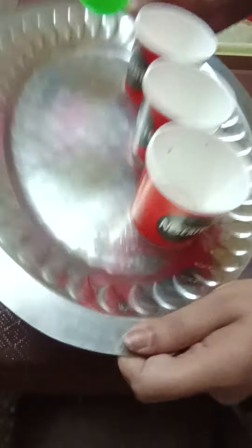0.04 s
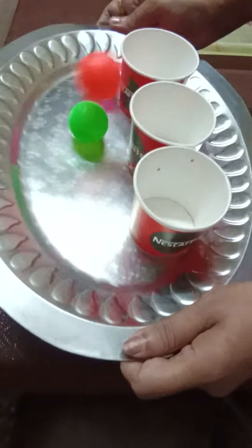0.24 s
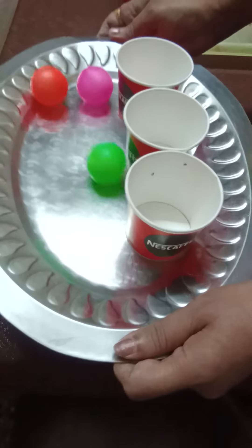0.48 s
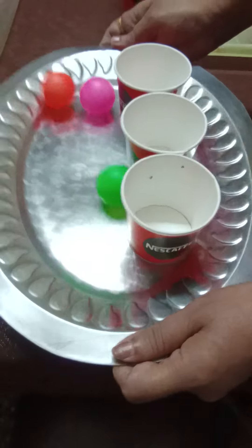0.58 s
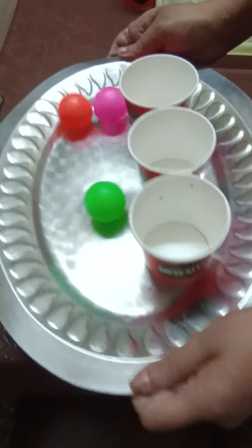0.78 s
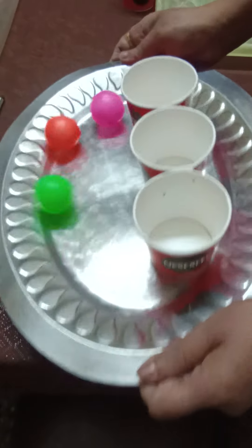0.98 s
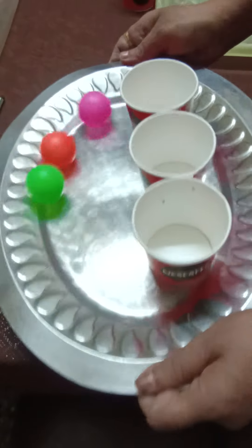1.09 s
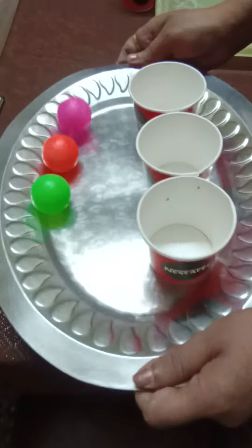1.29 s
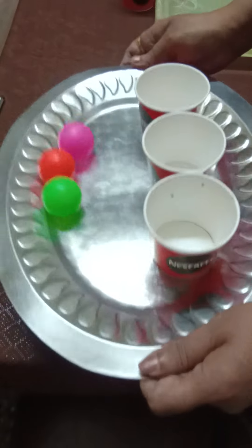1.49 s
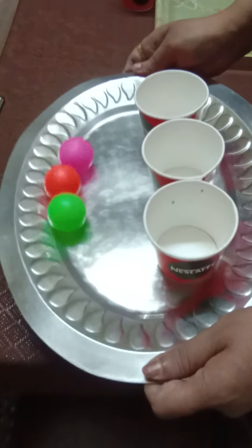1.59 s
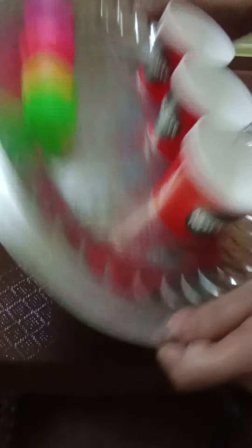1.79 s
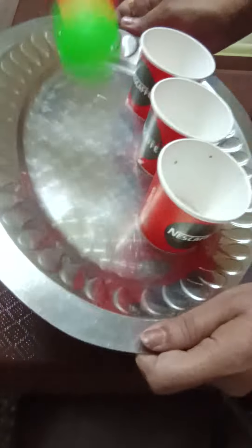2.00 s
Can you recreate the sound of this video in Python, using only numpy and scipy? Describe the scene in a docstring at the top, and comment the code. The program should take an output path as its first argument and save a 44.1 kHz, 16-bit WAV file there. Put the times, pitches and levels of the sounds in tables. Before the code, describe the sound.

Small hollow balls clatter onto a hand-held metal tray, each bounce making it ring briefly. Softer rolling follows, with light knocks on the rim and against each other, then dies away. The microphone is close, in a quiet room.

```python
"""A quiet room: three light plastic balls drop onto a thin, hand-held metal tray, bounce, roll
and knock against its fluted rim. Each contact gives a short clack and sets the sheet ringing;
rolling is a stream of tiny contacts on the same sheet. The hollow shells click against each other.
Two close microphone ports hear it over faint rumble and hiss."""
import sys
import numpy as np
from scipy import signal
from scipy.fft import rfft, irfft
from scipy.io import wavfile

SR = 44100
rng = np.random.default_rng(int(sys.argv[2]) if len(sys.argv) > 2 else 0)


def master(y):
    """Save y as 16-bit WAV."""
    cut = np.clip(np.atleast_2d(y).T, -1, 1)
    pcm = np.round(cut * 32767)  # scale
    wavfile.write(sys.argv[1], SR, pcm.astype(np.int16))


N = 90404

# Ball contacts. Each row: start in seconds, level in dB, then hollow body, hard clang, bright tick in dB.
HITS = [(-.04, -41.5, 6, -0.5, 5.5), (.2353, -22.5, 4.5, -1, 2), (.2615, -33.5, -11, 0, 7.5),
        (.2985, -15, -4.5, 6.5, 0.5), (.3495, -20, -1.5, -4, -1), (.3752, -24.5, -13, -3, -2.5),
        (.4228, -25, 0, 0.5, -0.5), (0.4498, -40, 0, 9, 7), (.4607, -16.5, -4, 4, 0.5),
        (.5205, -28, 1, -0.5, -5), (.567, -30.5, -1, -5, -0.5), (.578, -39.5, -27, -3, 2),
        (.598, -35, -6, -9, -7), (.632, -42.5, 4.5, 6, -5), (.7168, -39.5, 0.5, -3.5, 4),
        (.7497, -38.5, 5.5, -3.5, -1.5), (.7735, -40.5, -4, -8, -2), (0.786, -48.5, -11, -10, 7),
        (.803, -48, -2, -1, 5), (.844, -51, -13, -7, 5), (.8555, -41.5, 5, -1.5, -3.5),
        (0.9051, -48, -5, 7, 2.5), (.9686, -49, 2.5, -11, -13), (1.052, -45, 1, -27, -3),
        (1.0966, -38.5, -7, -0.5, -8), (1.1103, -36.5, 8.5, -1.5, 3.5), (1.121, -36, 2, -21, -15),
        (1.158, -45.5, 20.5, 6.5, 8.5), (1.169, -43, 14, -19, -17), (1.1959, -40.5, 14.5, 3.5, 2),
        (1.2158, -42.5, 5, 1, 10), (1.2237, -30.5, -1, -2.5, -2), (1.259, -34, 1.5, -3.5, -0.5),
        (1.2862, -38.5, 4, 0, 1.5), (1.3096, -38.5, 3.5, -4, 0), (1.3297, -39, -2, -9, -3.5),
        (1.357, -41, -12, -6, -7), (1.367, -50, 8.5, -17, 3), (1.4201, -29.5, -5, -8.5, -5),
        (1.4502, -28, -5.5, -2.5, -5.5), (1.4843, -40, -5, -3, -3), (1.5, -36, -7, -2, -3),
        (1.5586, -48, 8, 6.5, 5.5), (1.567, -45, -7, 4.5, -3), (1.582, -44, 4, -3, -1),
        (1.6129, -44.5, -17, 1.5, 0.5), (1.629, -58.5, -16, 21, -6), (1.6992, -57, 5, 0, -16),
        (1.7486, -61.5, 15, 2, 5), (1.7663, -42.5, 1.5, -5.5, 0), (1.783, -43, -6.5, -1, -7),
        (1.797, -40, -7, -11, -10), (1.807, -48, 13, 6, 8.5), (1.814, -44, 2.5, 6.5, -2.5),
        (1.861, -41, 4, -5, -1)]
RING_SAMPLES, CLACK_SAMPLES = 32768, 8192
SHIMMER_T60_S = 0.2
AT_RIM_S = 1.04  # the balls reach the rim


def bounces(answers, at_rim):
    """Knocks at the rim or landings on the flat floor; each excites its own answer of the tray."""
    out = np.zeros((2, N + 2 * RING_SAMPLES))
    for (start_s, level_db, *_), answer in zip(HITS, answers):
        if (start_s > AT_RIM_S) == at_rim:
            start = RING_SAMPLES + int(start_s * SR)
            out[:, start:start + RING_SAMPLES] += from_db(level_db) * answer
    return out[:, RING_SAMPLES:RING_SAMPLES + N]


def contact(hit):
    """Louder contacts thud more and ring longer; quiet ones die away sooner."""
    _, level_db, body_db, clang_db, tick_db = hit
    quiet_to_loud_db = [-50.5, -13.5]
    thud_db = np.interp(level_db, quiet_to_loud_db, [-3.5, 3.5])
    ring_share = np.interp(level_db, quiet_to_loud_db, [0.82, 1])
    return body_db, clang_db, tick_db, thud_db, ring_share


def tray(contacts, swell_s=0.00029):
    """The sheet's stereo answer to each contact, swelling as the bending wave spreads."""
    t = np.arange(RING_SAMPLES) / SR
    tail_fade = np.array([from_db(-60 * t / SHIMMER_T60_S * (1 / ring_share - 1))
                          for *_, ring_share in contacts])
    answers = (shimmer(contacts) + tray_tones(contacts)) * tail_fade[:, None]
    answers[..., :CLACK_SAMPLES] += clack(contacts)
    return answers * (1 - np.exp(-t / swell_s))


def clack(contacts):
    """The sheet's first burst, in third octaves; the bass lasts longest."""
    # Burst spectrum. Each row: frequency in Hz, relative density in dB.
    spectrum = [(90, -42.5), (200, -21.5), (380, -27.5), (500, -7), (620, 3), (800, 4), (1000, -2),
                (1250, 5), (1650, 0.5), (2100, -3.5), (2600, -4.5), (2820, -13.5), (3800, -11.5),
                (5000, -13.5), (5900, -15.5), (7200, -13.5), (9000, -14), (11000, -21), (14500, -22.5),
                (16500, -13)]
    # Burst decay. Each row: frequency in Hz, T60 in seconds.
    decay = [(200, 0.33), (700, 0.043), (2000, 0.059), (5000, 0.043), (12000, 0.017)]
    hz = np.fft.rfftfreq(CLACK_SAMPLES, 1 / SR)
    edges_hz = np.geomspace(80, 17000, 25)
    centres_hz = np.sqrt(edges_hz[1:] * edges_hz[:-1])
    gains = from_db(at_hz(spectrum, centres_hz)) * np.sqrt(np.diff(edges_hz))
    gains /= np.linalg.norm(gains)
    waves = at_ports(hz, len(contacts)) * from_db(at_hz(spectrum, hz))
    out = 0
    for low, high, centre, gain in zip(edges_hz, edges_hz[1:], centres_hz, gains):
        envelope = fade(at_hz(decay, centre), CLACK_SAMPLES)
        noise = irfft(waves * ((hz >= low) & (hz < high)))
        band = rms_one(noise * envelope) * np.sqrt(np.mean(envelope ** 2))
        out = out + gain * colour(contacts, [centre]) * band
    return 2 * out


def tray_tones(contacts, spread_db=5):
    """Strong modes give the tray its pitch; each spot struck favours other modes."""
    # Tray modes. Each row: frequency in Hz, level in dB, T60 in seconds at full ring time.
    modes = [(221.6, -37, 0.46), (495.5, -23.5, 0.35), (589.6, -17, 0.4), (605.3, -13.5, 0.13),
             (679.6, -14.5, 0.27), (777, -18.5, 0.3), (868, -25.5, 0.41), (972, -37, .42),
             (1144, -24.5, .33), (1223, -20, 0.5), (1437, -23.5, 0.43), (1553, -16.5, 0.33),
             (1680, -22.5, 0.37), (2244, -22, 0.39), (2580, -28, 0.54), (2596, -16, 0.11),
             (2703, -30, 0.53), (2900, -33.5, 1), (3170, -31, 0.55)]
    hz, level_db, t60_s = np.transpose(modes)
    strengths = from_db(level_db + spread_db * rng.uniform(-1, 1, (len(contacts), 1, len(hz))))
    excitation = at_ports(hz, len(contacts)) * colour(contacts, hz) * strengths
    return np.real(excitation @ ringing(hz, t60_s, RING_SAMPLES))


def shimmer(contacts, count=480, level_db=-11.5, split_hz=1900, treble_t60_s=0.34):
    """Hundreds of weak sheet modes linger, struck with new phases at each contact."""
    # Weak-mode spectrum. Each row: frequency in Hz, relative density in dB.
    spectrum = [(120, -43), (210, -15.5), (380, -5.5), (520, -14.5), (750, -22), (1020, 11.5),
                (1300, -14.5), (1700, -8), (2100, -3), (2550, -4.5), (2900, -5), (3800, -5.5),
                (5000, -10.5), (5900, -17), (7200, -7), (9000, -14.5), (11000, -21.5), (14500, -25),
                (16500, -52)]
    steps = (np.arange(count) + rng.random(count)) / count
    hz = 120 + 3000 * steps + 13500 * steps ** 3
    gains = from_db(at_hz(spectrum, hz)) * np.sqrt(np.gradient(hz))
    gains /= np.linalg.norm(gains)
    bins = (hz * RING_SAMPLES / SR).astype(int)
    modes = np.zeros((len(contacts), 2, RING_SAMPLES // 2 + 1), complex)
    modes[..., bins] = at_ports(hz, len(contacts)) * colour(contacts, hz) * gains
    is_low = np.fft.rfftfreq(RING_SAMPLES, 1 / SR) < split_hz
    lows = irfft(modes * is_low) * fade(SHIMMER_T60_S, RING_SAMPLES)
    treble = irfft(modes * ~is_low) * fade(treble_t60_s, RING_SAMPLES)
    return from_db(level_db) * RING_SAMPLES / np.sqrt(2) * (lows + treble)


def colour(contacts, hz):
    """Each contact's gain over frequency, from its thud, body, clang and tick."""
    gains_db = [at_hz([(438, thud_db), (600, body_db), (1250, 0), (1940, clang_db), (9000, tick_db)], hz)
                for body_db, clang_db, tick_db, thud_db, _ in contacts]
    return from_db(gains_db)[:, None]


def rolling(answers, contacts_per_s=450, gain_db=-3):
    """Seams and dents give a stream of tiny uneven contacts over several spots of the sheet."""
    # Rolling strength. Each row: time in seconds, relative level in dB.
    strength = [(0, -50), (0.042, -69.5), (.1, -83.5), (.2, -97), (.3, -60), (.55, -48), (.62, -46.5),
                (.66, -59), (.72, -47.5), (.78, -44), (.88, -44), (.95, -53), (1.029, -56.5), (1.068, -44),
                (1.16, -43.5), (1.3, -39), (1.38, -44), (1.405, -56), (1.47, -49.5), (1.54, -42.5),
                (1.6, -42.5), (1.641, -42), (1.66, -67), (1.71, -53.5), (1.745, -59.5), (1.779, -38.5),
                (1.84, -46), (1.88, -44.5), (1.925, -55.5), (1.96, -75.5), (2.05, -84.5)]
    touches = rng.random(N) < contacts_per_s / SR
    sizes = touches * from_db(-6 * np.minimum(rng.exponential(1, N), 3))
    sizes /= np.sqrt(np.mean(sizes ** 2) * np.mean(np.sum(answers ** 2, axis=-1)))
    impulses = sizes * from_db(gain_db + np.interp(np.arange(N) / SR, *np.transpose(strength)))
    spot = rng.integers(0, len(answers), N)
    return sum(signal.fftconvolve((impulses * (spot == k))[None], answer)[:, :N]
               for k, answer in enumerate(answers))


def rim(x, size=131072):
    """The stiff fluted rim colours the contacts along it: a minimum-phase filter."""
    # Rim response. Each row: frequency in Hz, gain in dB.
    response = [(250, -5.5), (460, -8), (520, -16), (590, 1.5), (680, -5), (800, -1.5), (950, -6.5),
                (1200, -1), (1450, -0.5), (1900, -4), (2250, -1.5), (2600, -4), (3300, 3.5), (4500, -0.5),
                (6000, -2), (7000, 3.5), (8000, 0.5), (10000, 2), (11500, 4), (15000, 0)]
    gain = from_db(at_hz(response, np.fft.rfftfreq(size, 1 / SR)))
    cepstrum = irfft(np.log(gain))
    cepstrum[1:size // 2] *= 2
    cepstrum[size // 2:] = 0
    return irfft(rfft(x, size) * np.exp(rfft(cepstrum)))[:, :N]


def ball_clicks():
    """Ball meets ball: the thin shells ring high and very briefly."""
    # Collisions. Each row: start in seconds, level in dB.
    clicks = [(.2618, -36), (1.2155, -28), (1.5586, -44), (1.566, -44), (1.7486, -55)]
    # Shell modes. Each row: frequency in Hz, relative level in dB, T60 in seconds.
    modes = [(7000, -5.5, 0.017), (6650, -7, .025), (7340, -7.5, .012), (9420, 2, .012), (8830, -4.5, .01),
             (11600, -7, .012), (13900, -12.5, .012)]
    hz, mode_db, t60_s = np.transpose(modes)
    rings = ringing(hz, t60_s, CLACK_SAMPLES)
    out = np.zeros((2, N + CLACK_SAMPLES))
    for (start_s, level_db), ports in zip(clicks, at_ports(hz, len(clicks))):
        start = int(start_s * SR)
        out[:, start:start + CLACK_SAMPLES] += np.real(ports * from_db(mode_db + level_db) @ rings)
    return out[:, :N]


def room(level_db=-64):
    """Faint rumble and hiss."""
    # Room noise. Each row: frequency in Hz, relative density in dB.
    spectrum = [(15, -17.5), (28, -7.5), (40, 5), (55, -7.5), (80, -10.5), (115, -4), (170, -13.5),
                (300, -21), (600, -31), (1500, -37.5), (4000, -35.5), (15000, -46.5)]
    hz = np.fft.rfftfreq(N, 1 / SR)
    noise = irfft(at_ports(hz, 1)[0] * from_db(at_hz(spectrum, hz)), N)
    return from_db(level_db) * rms_one(noise)


def at_ports(hz, count, right_lag_s=0.00006):
    """Random-phase complex gains at the two ports; the tray lies a little to the left."""
    # Likeness of the ports. Each row: frequency in Hz, left-right correlation.
    likeness = [(100, 0.88), (300, .88), (640, .84), (1400, 0.58), (2400, 0.32), (4000, .25), (15000, .05)]
    # Stereo balance. Each row: frequency in Hz, left minus right in dB.
    balance = [(100, 0), (300, -0.5), (700, 6.5), (1290, 0.5), (2380, 3), (4400, -2), (8100, -2),
               (14000, -6.5)]
    left_rad = rng.uniform(0, 2 * np.pi, (count, len(hz)))
    spread_rad = np.sqrt(-2 * np.log(at_hz(likeness, hz)))
    stray_rad = spread_rad * rng.standard_normal((count, len(hz)))
    right_rad = left_rad + stray_rad - 2 * np.pi * hz * right_lag_s
    lean = from_db(at_hz(balance, hz) / 2)
    return np.stack([np.exp(1j * left_rad) * lean, np.exp(1j * right_rad) / lean], axis=1)


def ringing(hz, t60_s, size):
    """One decaying complex sinusoid per mode."""
    t = np.arange(size) / SR
    return np.array([np.exp(2j * np.pi * f * t) * fade(decay_s, size) for f, decay_s in zip(hz, t60_s)])


def fade(t60_s, size):
    """Exponential decay from 1."""
    return np.exp(-np.log(1000) * np.arange(size) / SR / t60_s)


def at_hz(points, hz):
    """Read a table on a log-frequency axis."""
    points_hz, values = np.transpose(points)
    return np.interp(np.log(np.maximum(hz, 1)), np.log(points_hz), values)


def from_db(db):
    """Decibels to gain."""
    return 10 ** (np.asarray(db) / 20)


def rms_one(x):
    """Scale each stereo sound to rms 1."""
    return x / np.sqrt(np.mean(x ** 2, axis=(-2, -1), keepdims=True) + 1e-30)


def scene(roll_spots=8, lowest_hz=168):
    """The balls bounce and roll on the tray's flat floor, then along its rim."""
    roll_contact = (7.3, -1, -0.5, 10.5, 0.67)  # body, clang, tick, thud in dB; share of ring time
    answers = tray([roll_contact] * roll_spots + [contact(hit) for hit in HITS])
    roll_answers, hit_answers = answers[:roll_spots], answers[roll_spots:]
    roll = rolling(roll_answers)
    rim_share = np.clip((np.arange(N) / SR - AT_RIM_S) / .01, 0, 1)
    on_floor = bounces(hit_answers, at_rim=False) + roll * (1 - rim_share)
    on_rim = rim(bounces(hit_answers, at_rim=True) + roll * rim_share)
    low_cut = signal.butter(4, lowest_hz, "high", fs=SR, output="sos")  # the contacts carry no deep bass
    return signal.sosfilt(low_cut, on_floor + on_rim) + ball_clicks() + room()


def record(dry, cutoff_hz=15600):
    """Steep treble cut."""
    return signal.sosfilt(signal.ellip(10, .2, 80, cutoff_hz, fs=SR, output="sos"), dry)


dry = scene()
out = record(dry)
master(out)
```